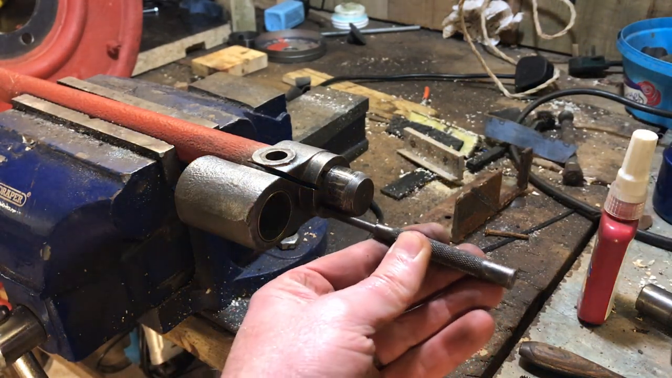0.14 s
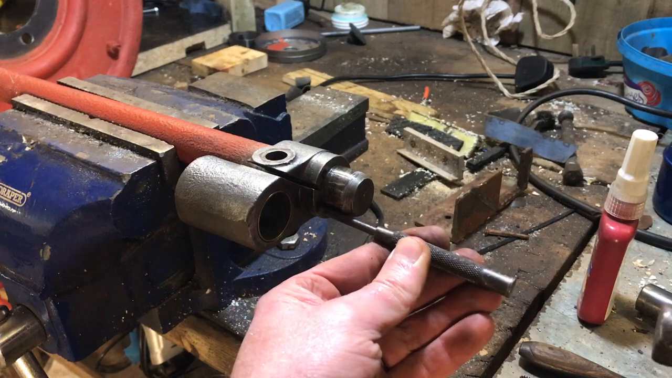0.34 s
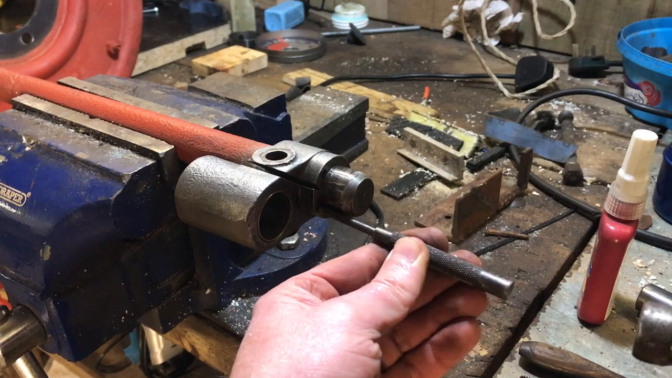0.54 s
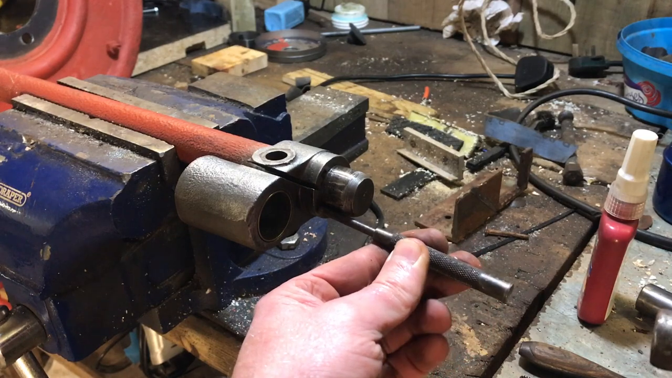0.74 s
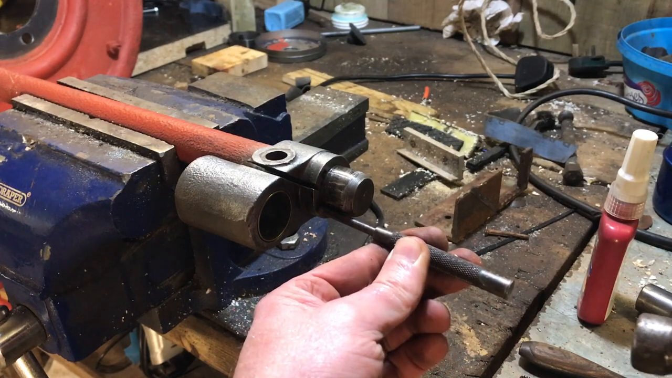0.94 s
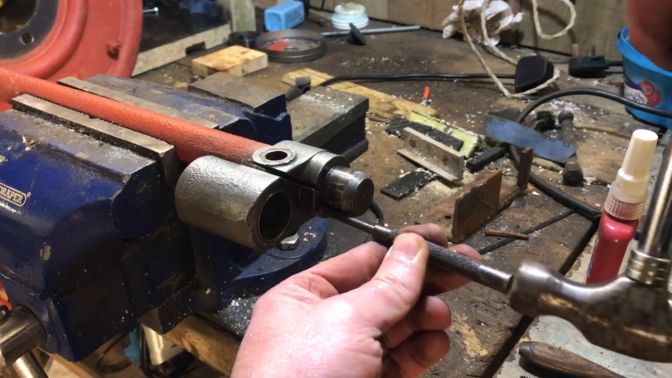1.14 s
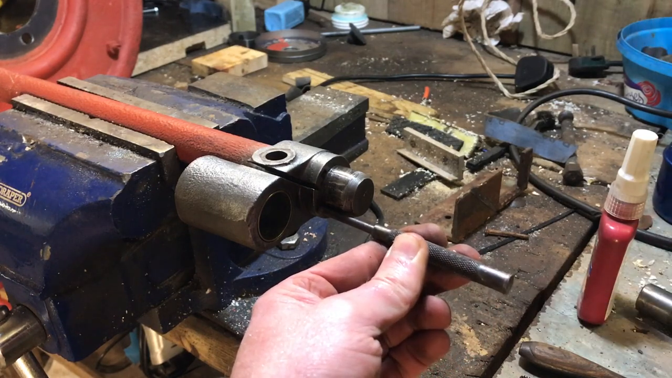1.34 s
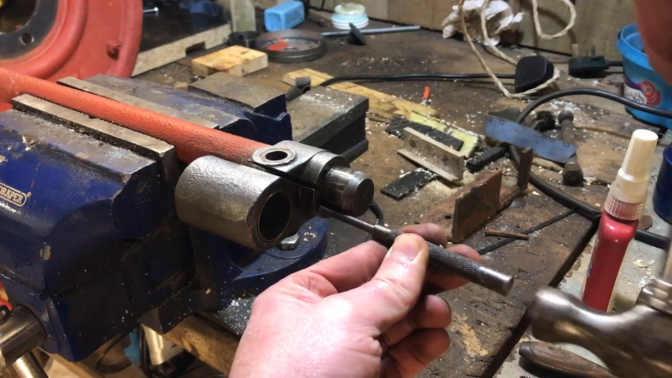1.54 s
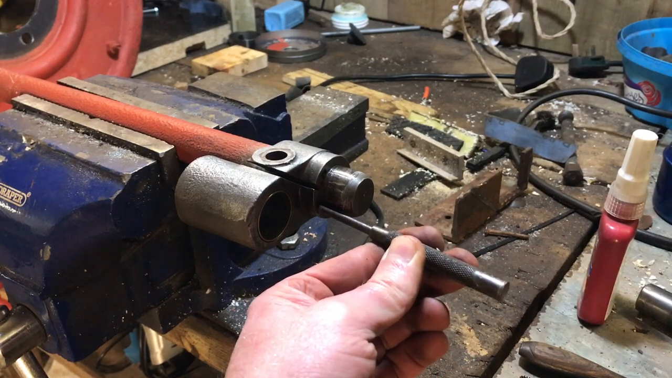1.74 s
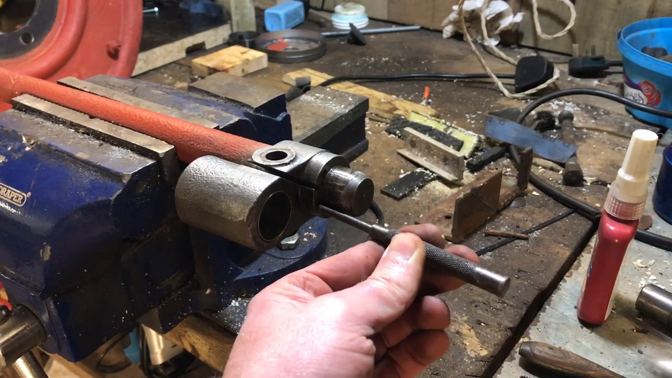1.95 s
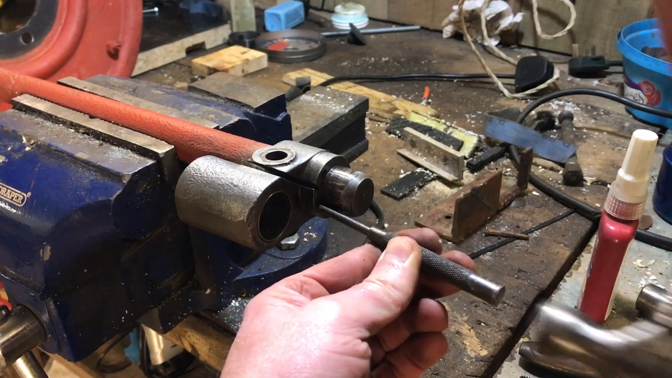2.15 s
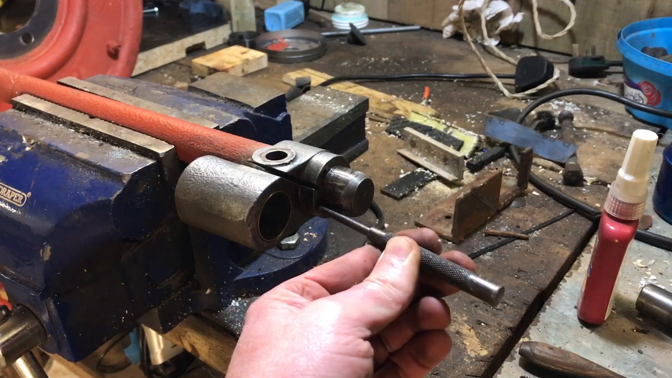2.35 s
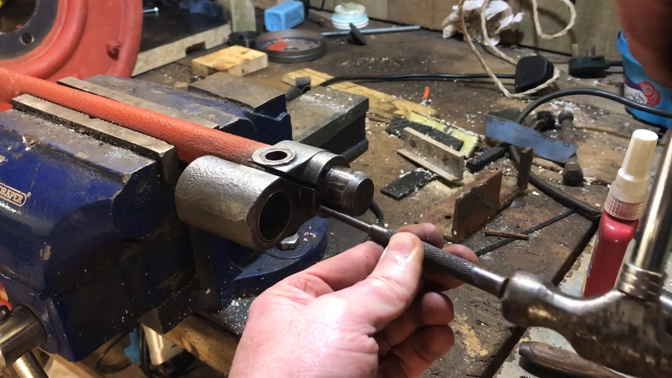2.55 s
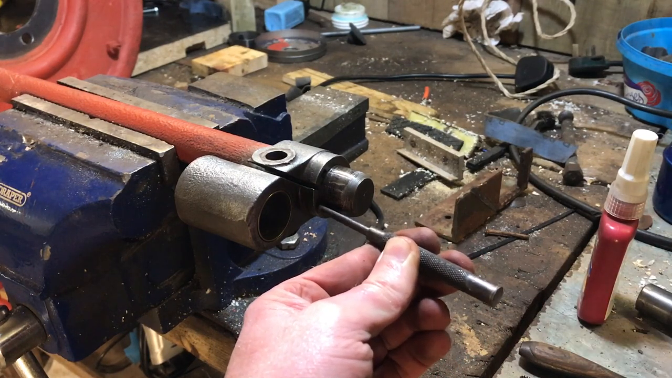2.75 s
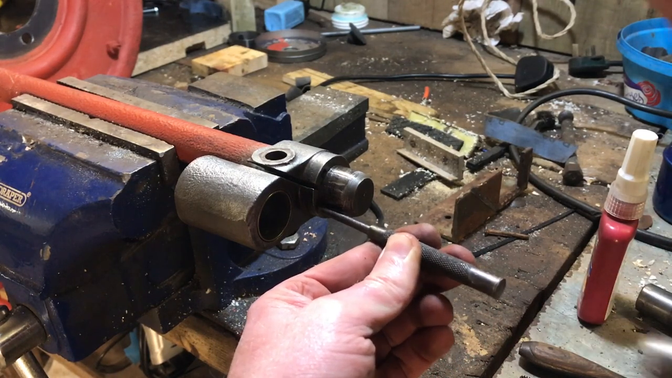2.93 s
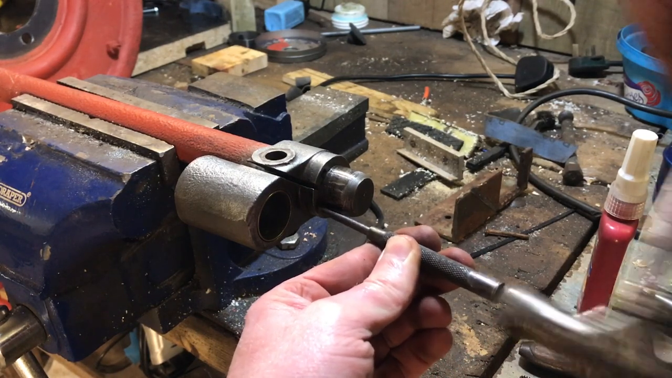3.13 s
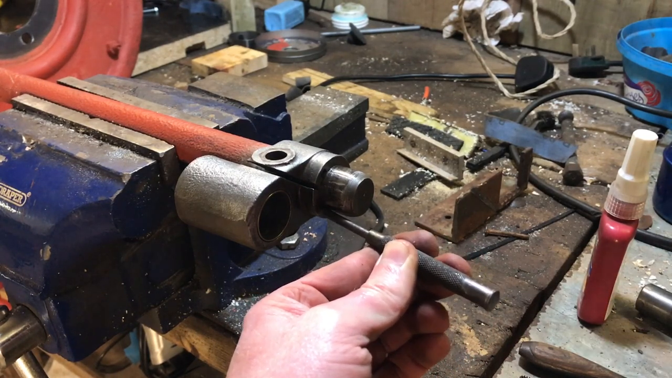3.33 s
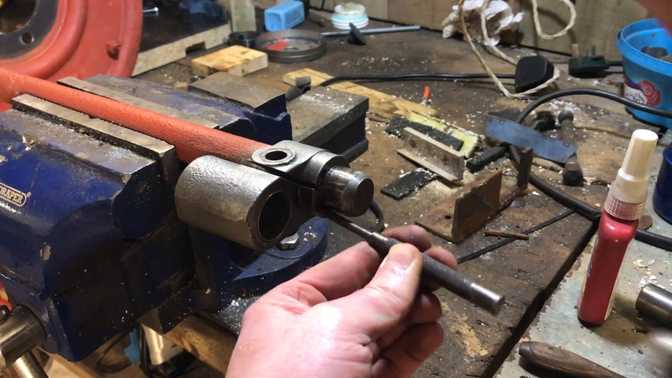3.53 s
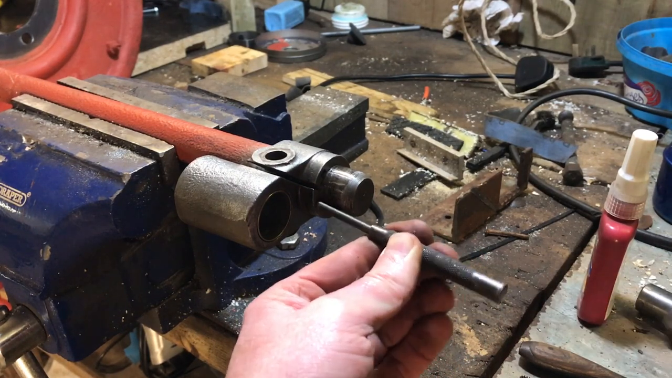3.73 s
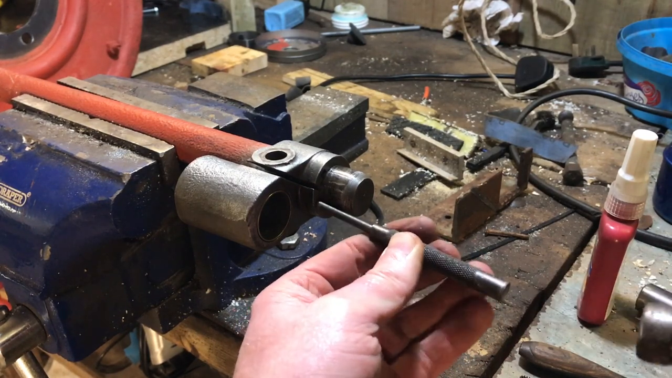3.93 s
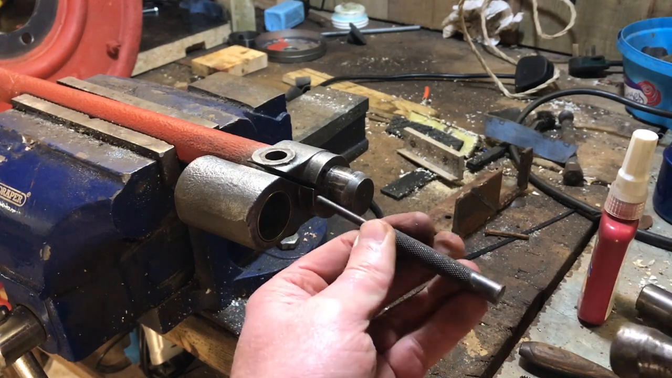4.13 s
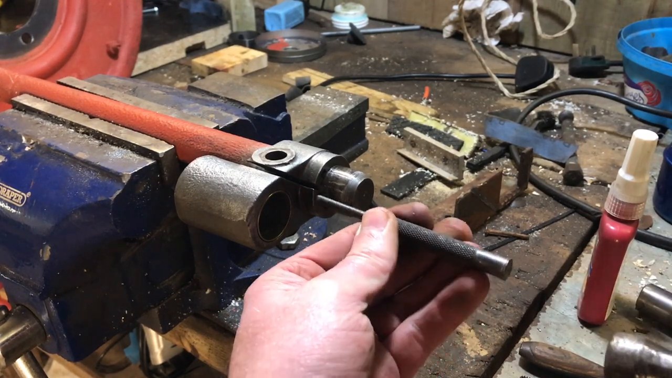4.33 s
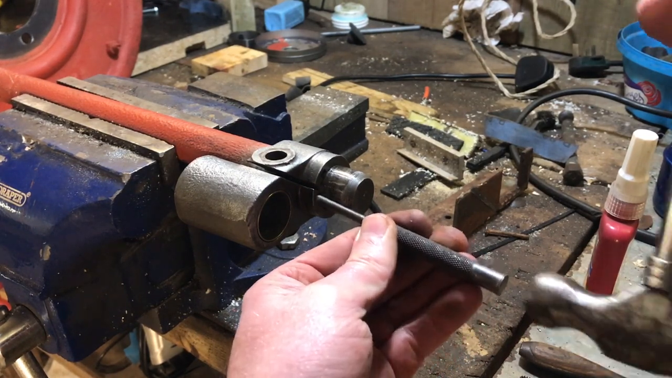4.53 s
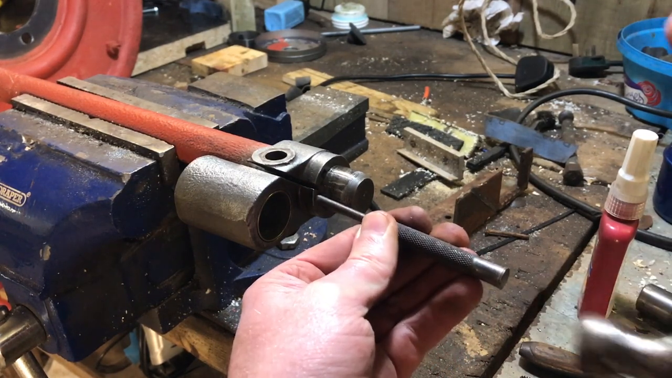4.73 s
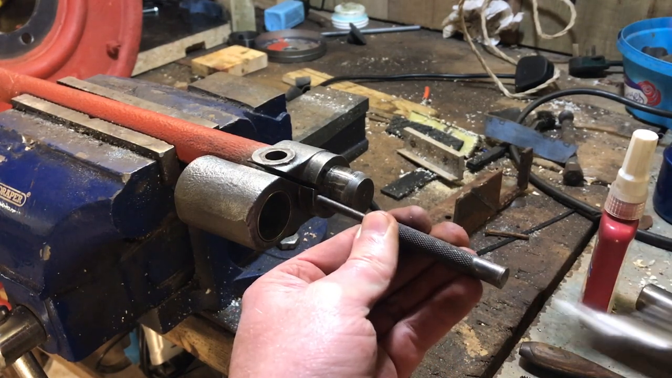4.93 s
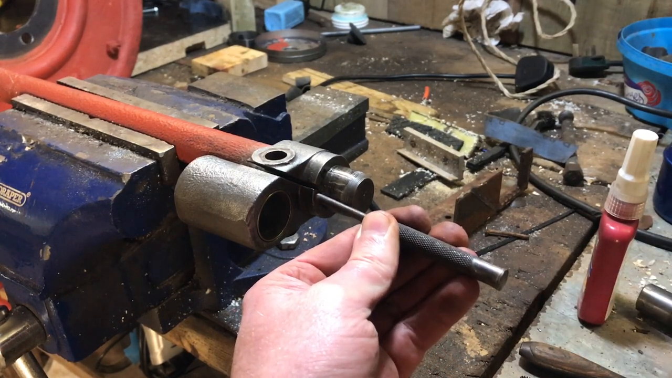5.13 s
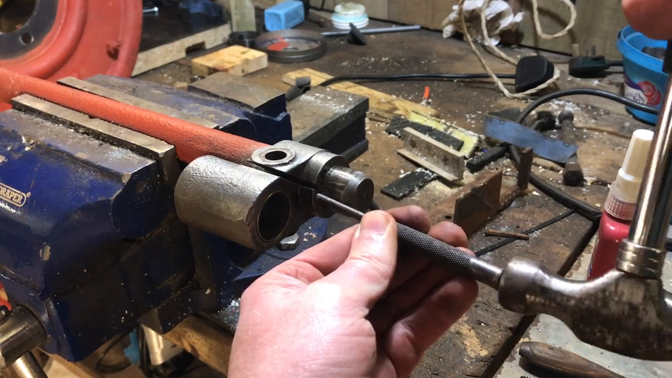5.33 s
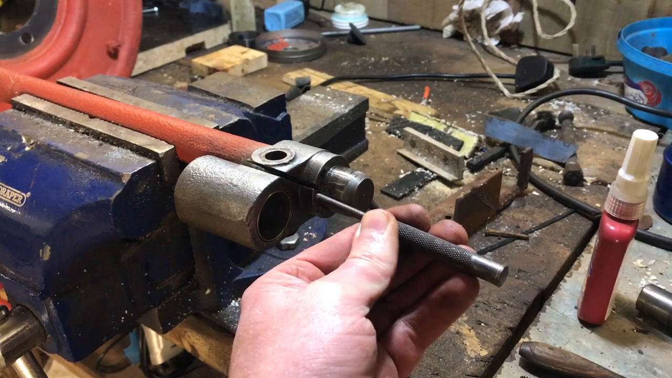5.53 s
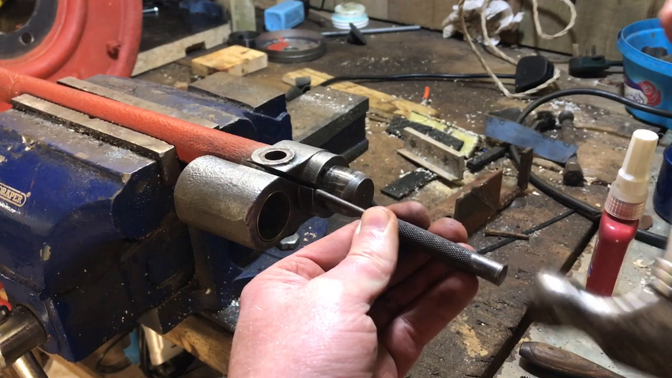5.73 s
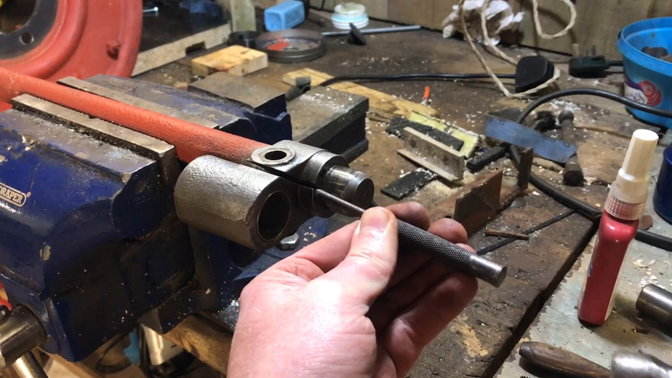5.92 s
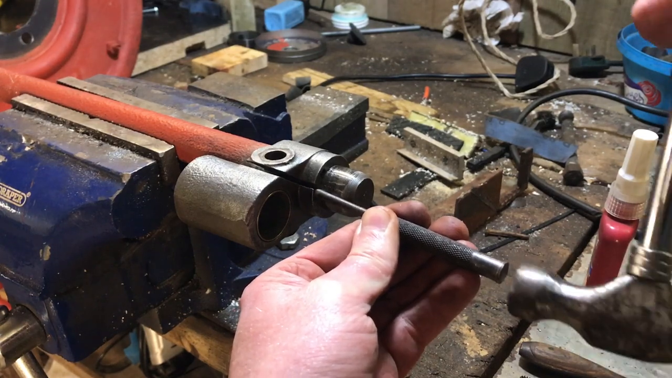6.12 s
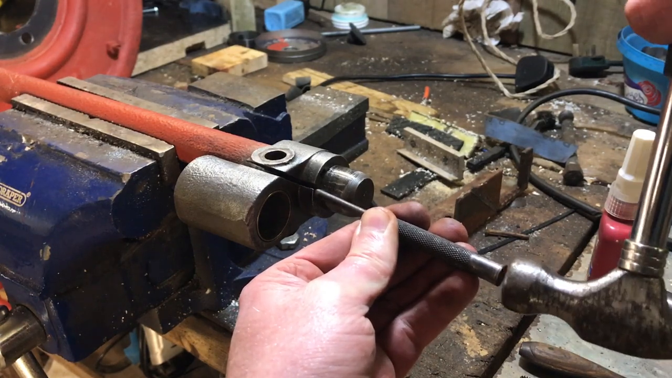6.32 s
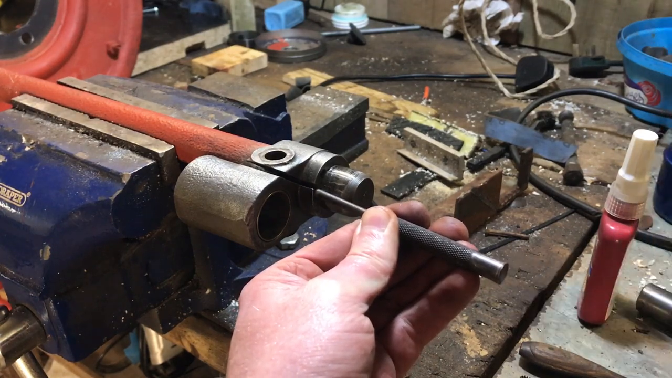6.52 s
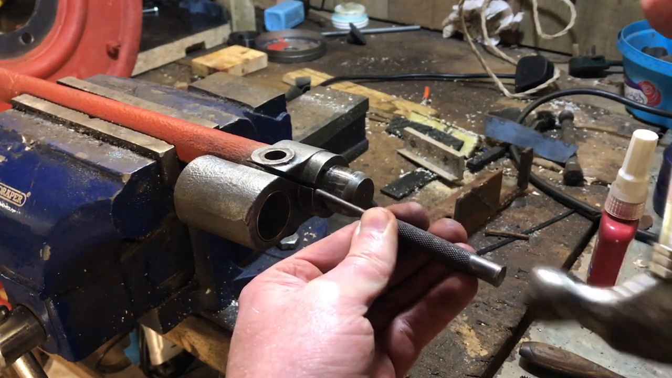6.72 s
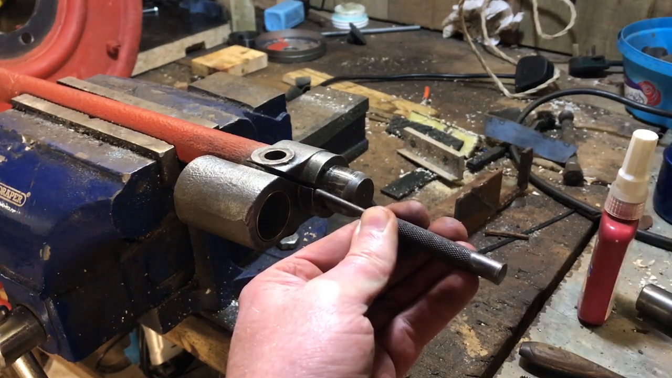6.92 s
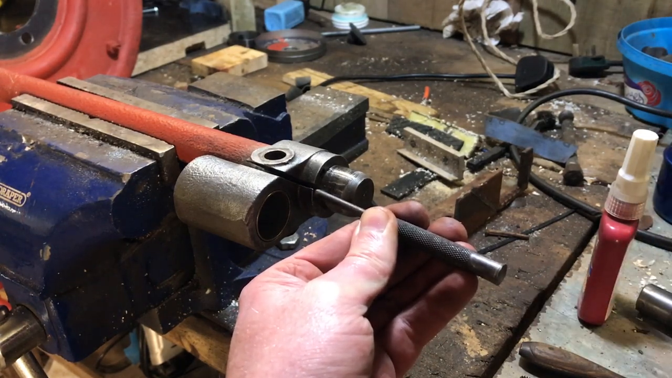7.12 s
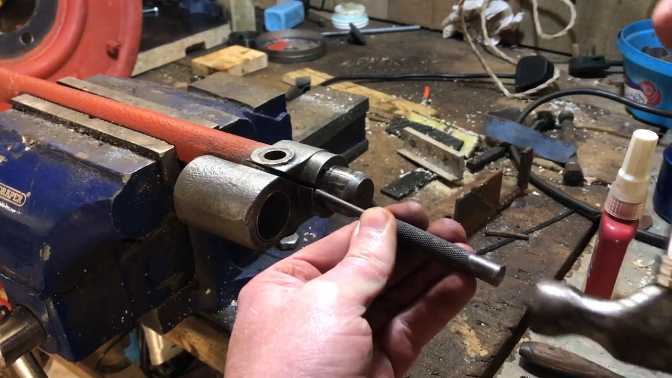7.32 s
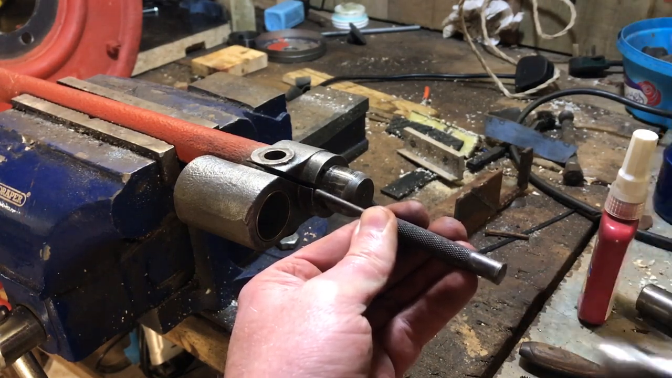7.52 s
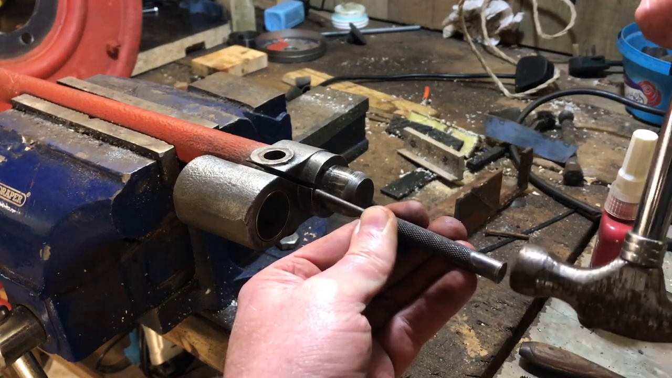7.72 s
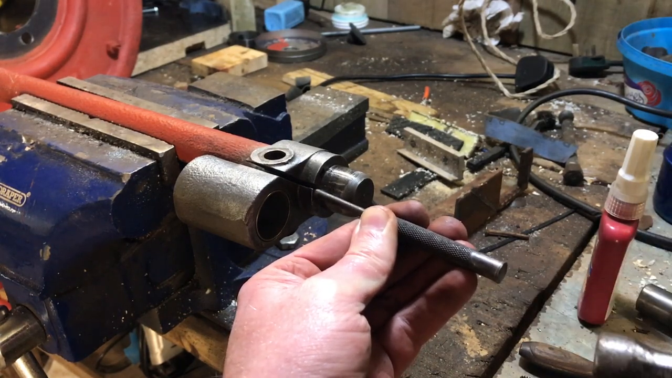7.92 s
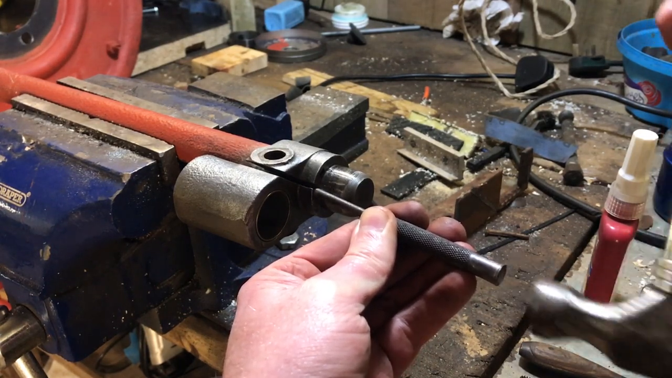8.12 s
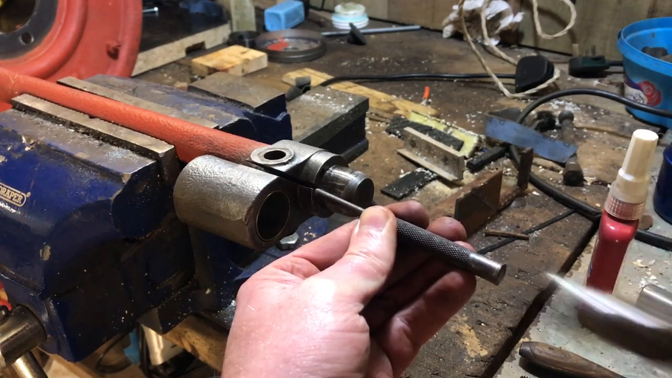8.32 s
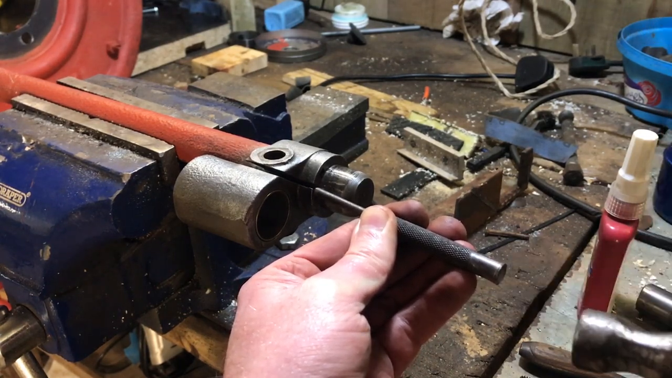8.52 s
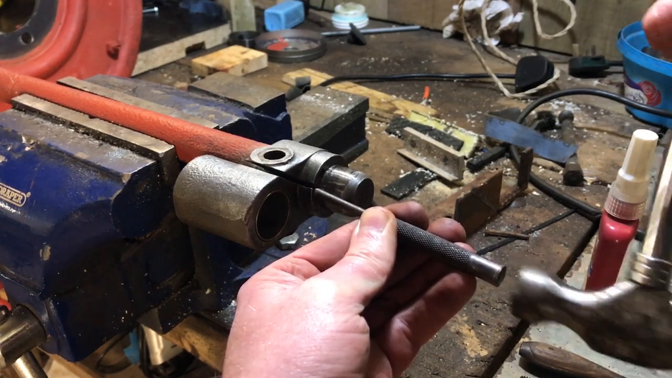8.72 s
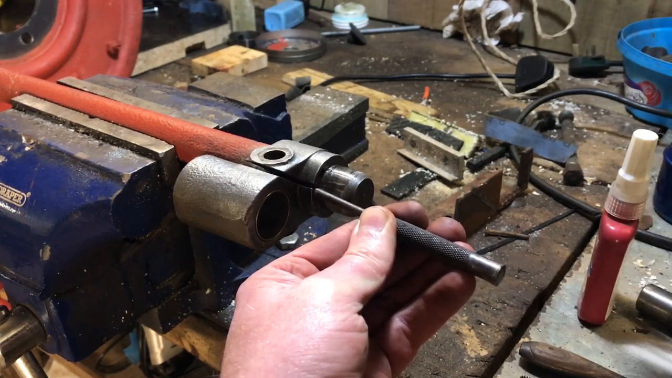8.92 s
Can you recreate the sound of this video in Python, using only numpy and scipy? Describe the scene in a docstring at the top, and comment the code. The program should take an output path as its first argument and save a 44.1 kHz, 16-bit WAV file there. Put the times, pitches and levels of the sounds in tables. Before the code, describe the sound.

Close in a small workshop, a hammer strikes a steel punch in uneven ringing runs of loud clanks and lighter taps, with brief squeaks between.

```python
"""Small workshop, close to a cluttered bench: a hammer taps a steel punch on a shaft fitting held in a vise.
Light taps ring the punch in beating tone pairs; firm blows swell dense noise through the modes of the bench.
Between runs, shaped noise makes finger rubs and scrapes, and gliding sines make the punch squeak.
Short soft resonant sounds and quiet room tone lie beneath.
The recorder's gain control ducks the loud blows and lets their tails back up."""
import sys
import numpy as np
from scipy import signal
from scipy.fft import rfft, irfft
from scipy.io import wavfile
from scipy.ndimage import uniform_filter1d

SR = 44100
rng = np.random.default_rng(int(sys.argv[2]) if len(sys.argv) > 2 else 0)


def pcm_store(signal):
    """Save signal as 16-bit PCM."""
    levels = np.round(np.clip(np.atleast_2d(signal), -1, 1) * 32767)
    wavfile.write(sys.argv[1], SR, levels.astype(np.int16).T)


N = 399546
AGE = np.arange(SR) / SR                 # time since a contact [s]
HZ = np.fft.rfftfreq(SR, 1 / SR) + 1     # frequency axis of one second; the 1 Hz offset keeps its log finite


def from_db(db):
    """Turn decibels into an amplitude factor."""
    return 10 ** (np.asarray(db) / 20)


def rms_one(x):
    """Scale to an rms of 1."""
    return x / np.sqrt(np.mean(x ** 2) + 1e-20)


def at_hz(points, hz):
    """Read a spectrum on a log-frequency axis."""
    point_hz, value = np.transpose(points)
    return np.interp(np.log(hz), np.log(point_hz), value)


def add(track, s, sound):
    """Mix a sound into the track at time s."""
    start = max(0, round(s * SR))
    track[start:start + len(sound)] += sound[:N - start]


def noise(spectrum, size):
    """Coloured noise of rms 1."""
    hz = np.fft.rfftfreq(size, 1 / SR) + 1
    white = rng.standard_normal(size)
    return rms_one(irfft(rfft(white) * from_db(at_hz(spectrum, hz)), size))


def narrow_noise(hz, width_hz):
    """One second of noise through a resonance, rms 1."""
    resonance = 1 / (1 + ((HZ - hz) / width_hz) ** 2)
    return rms_one(irfft(rfft(rng.standard_normal(SR)) * resonance, SR))


def onset(rise_s):
    """A sound rises exponentially towards full strength."""
    return 1 - np.exp(-AGE / rise_s)


# colour of the quiet workshop: (frequency [Hz], relative level [dB per Hz])
ROOM_COLOUR = [(20, -30), (40, -12), (70, 1.5), (110, -0.5), (200, 3), (320, 4), (600, 0.5), (1100, 2),
               (2500, -11), (4300, -14), (7600, -25.5), (14000, -32)]
ROOM_DB = -73.5


def background(fading_db=-61, fading_t60=0.47):
    """Steady room tone is coloured noise; a faint noisy ring dies away at the start."""
    t = np.arange(N) / SR
    fading_colour = [(200, -13), (1200, 5), (2500, -7), (3300, -3), (3700, 9), (4200, 0), (5500, -26)]
    fading = from_db(fading_db - 60 * t / fading_t60) * noise(fading_colour, N)
    return from_db(ROOM_DB) * noise(ROOM_COLOUR, N) + fading


# the punch slides through the fingers: (time of peak [s], rise [s], fall [s], relative level [dB])
FINGER_RUBS = [(.42, .32, .24, -75), (4.15, .42, .33, -74.5)]
# the skin catches on the knurling: (time [s], relative level [dB], pitch [Hz])
KNURL_CATCHES = [(0.1947, -56, 6530), (0.2326, -54, 6480), (0.308, -57, 6480), (0.3818, -56, 7230),
                 (0.4202, -53, 3830), (0.4686, -52, 3850), (0.508, -58, 3880)]
# colour of skin rubbing on the punch: (frequency [Hz], relative level [dB per Hz])
RUBBING_COLOUR = [(1500, -29.5), (3200, -14), (3750, -0.5), (4200, -12.5), (4700, -3.5), (5100, -12.5),
                  (5600, -3.5), (6050, -15), (6570, -1.5), (7700, -16.5), (11000, -18.5), (12000, -14.5),
                  (14000, -20.5)]
# dull sound of the moving hand: (frequency [Hz], relative level [dB per Hz])
RUSTLE_COLOUR = [(100, -6), (400, 2), (1200, 4), (2500, -5), (4500, -18), (12000, -35)]
CATCH_DB, CATCH_RISE_S, CATCH_T60_S, CATCH_WIDTH_HZ = -5, .003, .1, 220


def fingers(flicker_db=2.5, rustle_db=5.5, rasp_db=-4):
    """Uneven rubs swell over the hand's rustle; each catch on the knurling rasps and rings the punch briefly."""
    t = np.arange(N) / SR
    # a new random grip 100 times a second, joined by straight lines
    grip = np.interp(t, np.arange(1000) / 100, rng.standard_normal(1000))
    motion = np.zeros(N)
    for s, rise, fall, db in FINGER_RUBS:
        side_s = np.where(t < s, rise, fall)
        motion += from_db(db) * np.exp(-((t - s) / side_s) ** 2)
    rubbing = from_db(flicker_db * grip) * noise(RUBBING_COLOUR, N)
    rustle = from_db(rustle_db) * noise(RUSTLE_COLOUR, N)
    out = motion * (rubbing + rustle)
    for s, db, hz in KNURL_CATCHES:
        catch = narrow_noise(hz, CATCH_WIDTH_HZ) + from_db(rasp_db) * noise(RUBBING_COLOUR, SR)
        decay = from_db(db + CATCH_DB - 60 * AGE / CATCH_T60_S)
        add(out, s, catch * decay * onset(CATCH_RISE_S))
    return out


# short soft resonant sounds, some just before a blow:
# (time [s], level [dB], pitch [Hz], width [Hz], t60 [s])
SOFT_RESONANCES = [(1.598, -50, 3020, 200, 0.16), (3.543, -32, 600, 255, 0.028),
                   (3.845, -55, 600, 60, 0.33), (4.287, -57, 6000, 399, .05),
                   (5.057, -32.5, 497, 197, 0.17), (5.078, -26, 62, 18, .16), (6.752, -44, 3030, 300, 0.13),
                   (7.789, -33, 520, 149, 0.16), (8.352, -30.5, 860, 70, 0.096)]


def soft_resonances():
    """Each soft sound is noise through one resonance, rising quickly and dying away."""
    out = np.zeros(N)
    for s, db, hz, width_hz, t60 in SOFT_RESONANCES:
        decay = from_db(db - 60 * AGE / t60)
        add(out, s, narrow_noise(hz, width_hz) * decay * onset(0.0016))
    return out


# the punch slides on steel: (time [s], level [dB], t60 [s])
PUNCH_SCRAPES = [(3.561, -36, .26), (3.814, -46.5, .38), (4.288, -60, .19)]
# colour of a scrape, also heard as the scratch in a squeak: (frequency [Hz], relative level [dB per Hz])
SCRAPE_COLOUR = [(120, -21.5), (200, -3), (494, -8.5), (581, -6.5), (946, -12.5), (3060, -7), (4810, -18.5),
                 (6300, -10.5), (15000, -33)]


def scrapes(rise_s=0.0051):
    """A short hiss of steel sliding on steel is decaying coloured noise."""
    out = np.zeros(N)
    for s, db, t60 in PUNCH_SCRAPES:
        decay = from_db(db - 60 * AGE / t60)
        add(out, s, noise(SCRAPE_COLOUR, SR) * decay * onset(rise_s))
    return out


# the punch tip squeaks in its hole:
# (time [s], length [s], pitch [Hz], level [dB], fall in pitch [share of the pitch])
TIP_SQUEAKS = [(3.673, .0154, 1370, -29.5, 0), (3.680, .033, 2450, -32, .04),
               (3.800, .017, 2430, -33, -.039), (4.097, .014, 2440, -37, .12),
               (4.108, .014, 2140, -44, .053), (4.100, .016, 1360, -47.5, .02),
               (4.089, .017, 7850, -54, .035), (4.088, .014, 13850, -55, .016),
               (3.671, .008, 13850, -53, .01)]


def squeaks(stop_s=0.00067, tail_db=-15, tail_t60=0.2, width_hz=150, scratch_db=-24, scratch_t60=.1):
    """Stick-slip feeds one mode of the punch until the grip lets go; a rough ring lingers briefly."""
    out = np.zeros(N)
    for s, length, hz, db, fall in TIP_SQUEAKS:
        grown = np.minimum(AGE / length, 1)
        after = np.maximum(AGE - length, 0)
        pitch_hz = hz * (1 + fall * (.5 - grown))
        sine = np.sqrt(2) * np.sin(2 * np.pi * np.cumsum(pitch_hz) / SR)
        tone = sine * np.exp(-after / stop_s)
        ring = narrow_noise(hz, width_hz) * from_db(tail_db - 60 * after / tail_t60)
        scratch = noise(SCRAPE_COLOUR, SR) * from_db(scratch_db - 60 * after / scratch_t60)
        swell = np.sin(np.pi / 2 * grown)
        add(out, s, from_db(db) * swell * (tone + ring + scratch))
    return out


# sharp clacks of the loose punch:
# (time [s], relative level [dB], snap level re the clack [dB], snap pitch [Hz], ring t60 [s])
PUNCH_CLACKS = [(2.657, -12.5, 2, 7570, 0.16), (2.962, -9.5, -2.5, 7550, 0.069),
                (4.731, -6, -2.5, 7500, 0.11), (6.301, -23, -17.5, 6350, .07),
                (6.330, -26.5, -2, 4240, 0.19), (6.793, -13, 1, 7900, 0.055),
                (7.118, -13, -16, 7800, 0.044), (8.166, -14, -12, 2600, 0.1), (8.175, -5, -12, 8200, 0.069),
                (8.792, -14.5, -19, 4300, 0.039), (8.799, -9, -24, 7900, 0.063),
                (9.045, -41, -2, 7940, .05)]
# colour of a clack's hollow ring: (frequency [Hz], relative level [dB per Hz])
CLACK_COLOUR = [(30, -58.5), (150, -32.5), (500, -13), (850, -2), (1250, 7), (1700, -9), (2100, -3),
                (3000, -26), (4250, -18), (5200, -38.5), (12000, -53.5)]


def clacks(tail_db=-20, room_t60=0.5, snap_t60=0.032, snap_width_hz=600, chatter_s=0.0042, rise_s=0.001,
           crack_db=5.5, crack_t60=0.011):
    """The punch chatters against the fitting: a crack, a bright snap, a short hollow ring and a little room."""
    out = np.zeros(N)
    after = np.maximum(AGE - chatter_s, 0)   # the ring holds steady before it decays
    for s, db, snap_db, snap_hz, t60 in PUNCH_CLACKS:
        ring_decay = from_db(-60 * after / t60)
        room_decay = from_db(tail_db - 60 * AGE / room_t60)
        ring = noise(CLACK_COLOUR, SR) * (ring_decay + room_decay)
        snap = narrow_noise(snap_hz, snap_width_hz) * from_db(-60 * AGE / snap_t60)
        crack = narrow_noise(snap_hz, 2 * snap_width_hz) * from_db(crack_db - 60 * AGE / crack_t60)
        clack = ring + from_db(snap_db) * (snap + crack)
        add(out, s, from_db(db) * clack * onset(rise_s))
    return out


# hammer blows, shared by the punch ring and the clank:
# (time [s], relative level [dB], firmness [0-1], bass shelf [dB], treble shelf [dB])
HAMMER_BLOWS = [(1.255, -18.7, .12, 5, 3), (1.614, -7.5, .81, 0, -4.5), (1.928, -8.7, .9, -3, -2.5),
                (2.286, -11.3, .55, -1, .5), (2.622, -4.3, .81, 1, -4), (2.932, -3, .75, 3.5, -1),
                (3.252, -7.3, .79, 4, .5), (4.693, -15, .08, 2, 3.5), (5.07, -5, 1, -8.5, -1),
                (5.446, -15.8, 0, 11.5, 5.5), (5.788, -6.8, 1, 0, 1.5), (6.766, -3.3, .85, 1.5, .5),
                (7.086, -2.5, .9, 0, -.5), (7.486, -12.5, .06, 6, -1.5), (7.801, -5.2, .98, -6, .5),
                (8.140, -5, .4, 3, -3.5), (8.453, -3.5, .97, 0, -1), (8.768, -6, .33, 1, -3)]
# solid blows and clean light taps ring longest, half-seated ones die soonest:
# (firmness [0-1], reference t60 [s], scaled for each band or tone)
SEATING_DECAY = [(0, .5), (.12, .54), (.33, .39), (.75, .475), (.85, .545), (1, .58)]
# clear tones of the punch and fitting:
# (frequency [Hz], level re the blow [dB], change under a firm blow [dB], t60 when fully seated [s])
PUNCH_TONES = [(841, -24, 2, .7), (1222, -15, -14, .6), (1287, -15, -8, .6), (1640, -22, -2, .5),
               (2353, -32, 9, .7), (3053, -32, 7, .7), (4290, -28, -2, .45), (7866, -24, -5, .36)]


def punch_ring(beat_hz=20, vary_db=3.0, build_s=0.014):
    """The steel sings in close pairs that beat; firm blows press the punch tight and mute most of its tones."""
    out = np.zeros(N)
    hz, level_db, firm_db, t60 = np.transpose(PUNCH_TONES)[:, :, None]
    for s, db, firm, *_ in HAMMER_BLOWS:
        # a half-seated punch also stops sooner
        seated = np.interp(firm, *np.transpose(SEATING_DECAY)) / SEATING_DECAY[-1][1]
        strength, split, phase, other_phase = rng.standard_normal((4, len(PUNCH_TONES), 1))
        tone = np.sin(2 * np.pi * (hz * AGE + phase))
        partner = .5 * np.sin(2 * np.pi * ((hz + beat_hz * split) * AGE + other_phase))
        tone_db = db + level_db + firm * firm_db + vary_db * strength
        tones = (tone + partner) * from_db(tone_db - 60 * AGE / (t60 * seated))
        add(out, s, tones.sum(axis=0) * onset(build_s))
    return out


# resonances of punch, shaft, vise and bench: (frequency [Hz], width [Hz], lift [dB])
BENCH_MODES = [(146, 10, 12), (206, 12, 10), (384, 10, 6), (404, 10, 10), (426, 8, 5), (474, 10, 6),
               (589, 22, 10), (640, 10, 8), (673, 10, 6), (764, 10, 5), (841, 10, 7), (866, 12, 6),
               (1012, 10, 6), (1222, 12, 5), (1287, 12, 7), (1402, 12, 6), (1530, 10, 6), (1638, 22, 8),
               (1893, 12, 5), (2115, 20, 4), (2302, 12, 6), (2353, 12, 7), (2586, 14, 7), (2650, 12, 6),
               (3053, 12, 6), (3603, 10, 8), (3885, 30, 5), (4285, 50, 5), (7866, 60, 11)]


def resonances():
    """Gain of the steel and bench over frequency: each mode stands out of a dense bed of weaker ones."""
    power = np.ones(len(HZ))
    for hz, width, db in BENCH_MODES:
        power += (from_db(db) ** 2 - 1) / (1 + (2 * (HZ - hz) / width) ** 2) ** 2
    return np.sqrt(power)


def uneven(width_hz):
    """A random ripple over frequency: among the crowded upper modes every blow favours its own."""
    ripple = rms_one(np.interp(HZ / width_hz, np.arange(SR // 8), rng.standard_normal(SR // 8)))
    return ripple / (1 + (1500 / HZ) ** 2)   # little ripple in the bass


# colour of a light tap: (frequency [Hz], relative level [dB per Hz])
LIGHT_COLOUR = [(40, -30), (80, -14), (140, -9), (280, -4), (400, 4.5), (850, 13), (1270, 16.5),
                (1550, 7.5), (2100, 7), (2600, -6.5), (4300, -5), (4950, -15), (6500, -4), (8200, -3.5),
                (10500, -16.5), (14000, -16.5)]
# colour of a firm blow: (frequency [Hz], relative level [dB per Hz])
FIRM_COLOUR = [(25, -27.5), (80, -2.5), (140, 1.5), (205, 2.5), (280, 8.5), (400, 10), (850, 8),
               (1270, 3.5), (2400, 3), (3300, 0), (4300, -4.5), (4950, -12.5), (6500, -8.5), (10400, -10.5),
               (13800, -4), (14500, -23.5)]
# how long each band rings: (frequency [Hz], share of the blow's reference t60 [ratio])
RING_SHARE = [(60, 1.1), (160, 0.98), (420, 0.85), (1100, 0.9), (2900, 1.14), (5500, 0.86), (7800, 0.77),
              (13000, 0.51)]
RATTLE_DB, RATTLE_PER_S = 1.0, 120   # loose parts make each clank flutter: depth, random levels per second


def blows(alike=0.37, swell_s=0.034, bass_lag=0.2, steepness=1.77, bass_hz=380, treble_hz=5200,
          lead_s=.002, uneven_db=2.5, cluster_hz=85):
    """Each blow sets the dense modes ringing; the treble builds first, the heavy bench last."""
    out, body = np.zeros(N), resonances()
    centres = np.geomspace(50, 14000, num=12)
    # overlapping triangular bands on a log-frequency axis
    bands = np.array([np.interp(np.log(HZ), np.log(centres), row) for row in np.eye(len(centres))])
    band_swell_s = swell_s * (centres[:, None] / 1000) ** -bass_lag
    build = 1 - np.exp(-(AGE / band_swell_s) ** steepness)
    same_steel = rng.standard_normal(SR)
    for s, db, firm, bass_db, treble_db in HAMMER_BLOWS:
        t60 = np.interp(firm, *np.transpose(SEATING_DECAY))
        # the same parts ring every time, but no two blows land alike
        ringing = np.sqrt(alike) * same_steel + np.sqrt(1 - alike) * rng.standard_normal(SR)
        colour_db = (1 - firm) * at_hz(LIGHT_COLOUR, HZ) + firm * at_hz(FIRM_COLOUR, HZ)
        colour = rms_one(body * from_db(colour_db + uneven_db * uneven(cluster_hz)))
        bass_shelf_db = bass_db / (1 + (HZ / bass_hz) ** 4)
        treble_shelf_db = treble_db / (1 + (treble_hz / HZ) ** 4)
        shelves = from_db(bass_shelf_db + treble_shelf_db)
        decay = from_db(-60 * AGE / (t60 * at_hz(RING_SHARE, centres)[:, None]))
        parts = irfft(bands * rfft(ringing) * colour * shelves, SR)
        rattle = np.interp(AGE * RATTLE_PER_S, np.arange(400), rng.standard_normal(400))
        clank = np.sum(parts * build * decay, axis=0)
        add(out, s - lead_s, from_db(db + RATTLE_DB * rattle) * clank)
    return out


def scene(blow_db=0.3, ring_db=0.0):
    """Everything on the bench, heard from close by."""
    quiet_sounds = background() + fingers() + soft_resonances() + scrapes() + squeaks()
    hammering = clacks() + from_db(ring_db) * punch_ring() + from_db(blow_db) * blows()
    return (quiet_sounds + hammering)[None]


def gain_control(x, threshold_db=-24, slope=0.33, size=64):
    """Each new peak turns the gain down at once; it is held for a moment, then recovers quickly."""
    hold_s, release_db_per_s, depth_db = .15, 220, 7.5
    power = uniform_filter1d(x ** 2, size=8 * size)
    level = 10 * np.log10(np.maximum(power, 1e-12))[::size]
    cuts, cut, since_peak, step = [], 0, 0, size / SR
    for wanted in np.maximum(slope * (level - threshold_db), 0):
        since_peak = 0 if wanted > cut else since_peak + step
        release = release_db_per_s * step * (since_peak > hold_s)
        cut = max(wanted, cut - release)
        cuts.append(min(cut, depth_db))
    cut_db = np.interp(np.arange(N) / size, np.arange(len(cuts)), cuts)
    return x * from_db(-cut_db)


CUTOFF_HZ = 15800


def record(dry):
    """The microphone signal passes the gain control, its highest peaks are rounded, then the top is cut."""
    x, ceiling = gain_control(dry[0]), .78
    x = x / (1 + (x / ceiling) ** 4) ** (1 / 4)
    top_cut = signal.ellip(10, .1, 80, CUTOFF_HZ, fs=SR, output="sos")
    return signal.sosfilt(top_cut, x)[None]


dry = scene()
out = record(dry)
pcm_store(out)
```